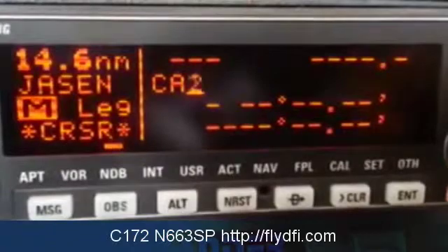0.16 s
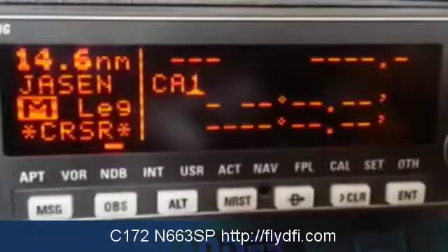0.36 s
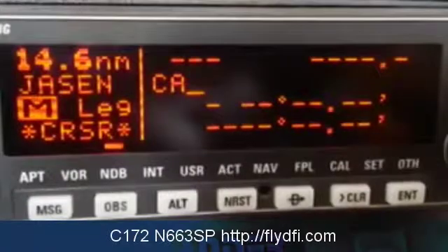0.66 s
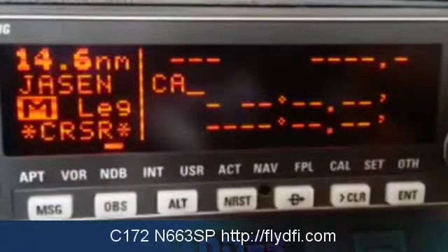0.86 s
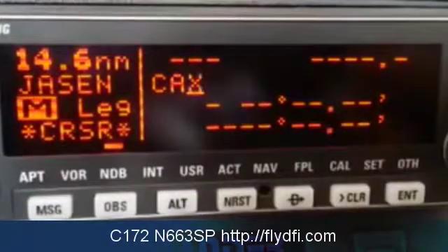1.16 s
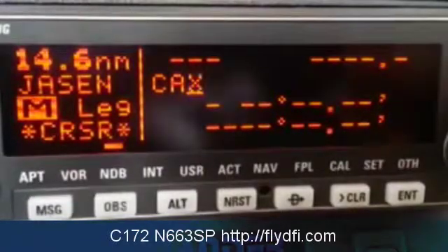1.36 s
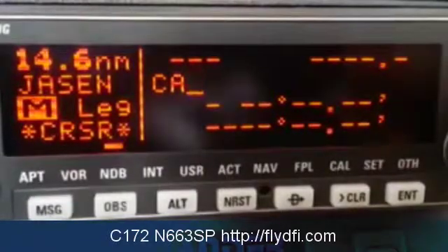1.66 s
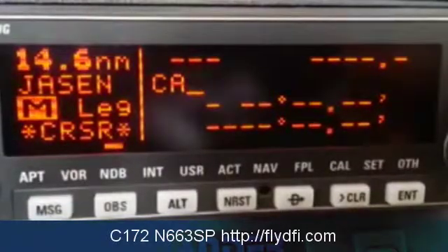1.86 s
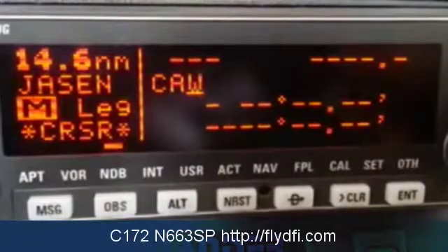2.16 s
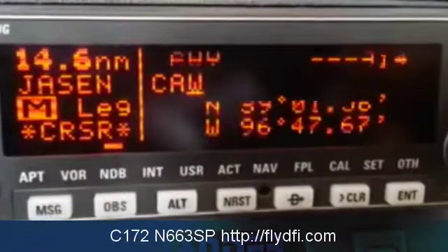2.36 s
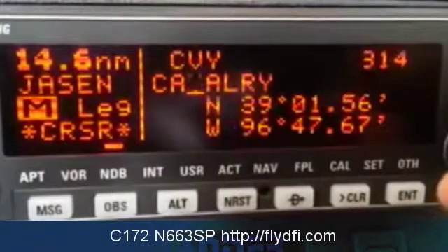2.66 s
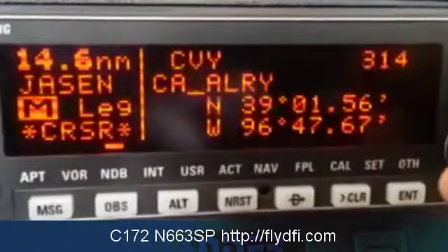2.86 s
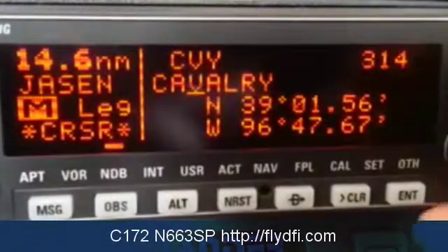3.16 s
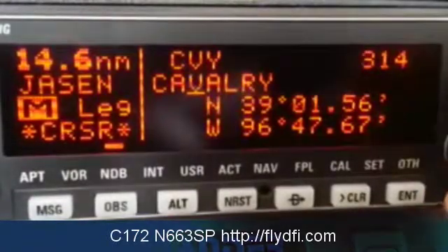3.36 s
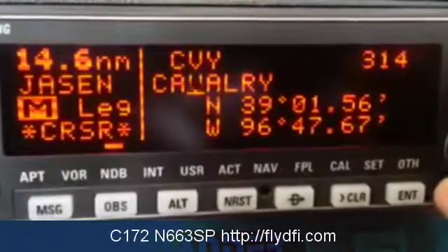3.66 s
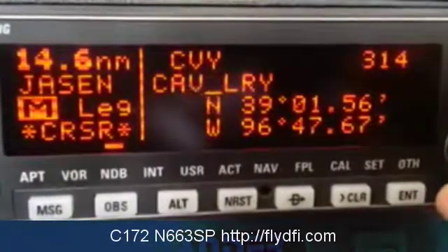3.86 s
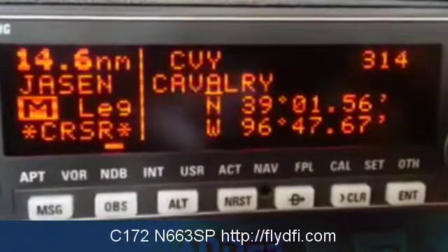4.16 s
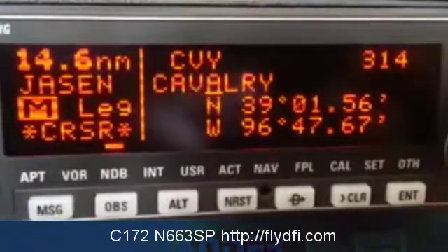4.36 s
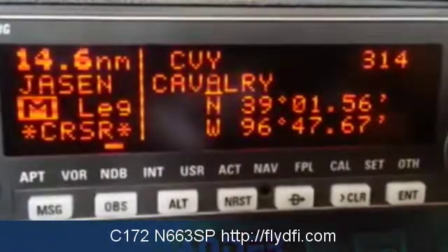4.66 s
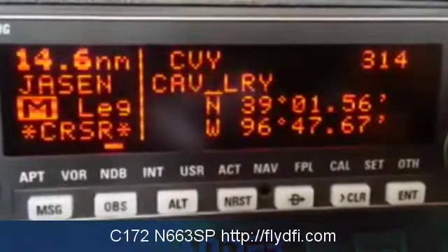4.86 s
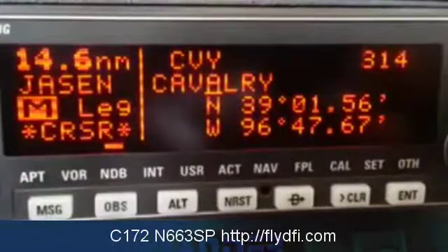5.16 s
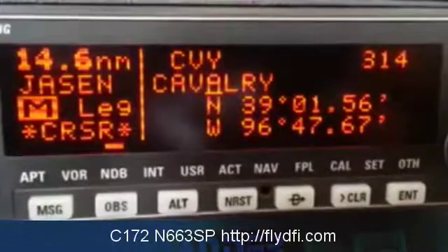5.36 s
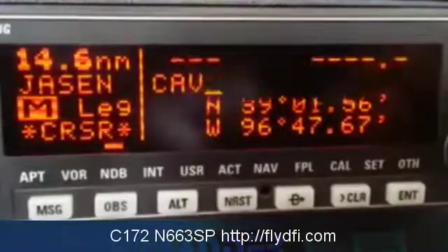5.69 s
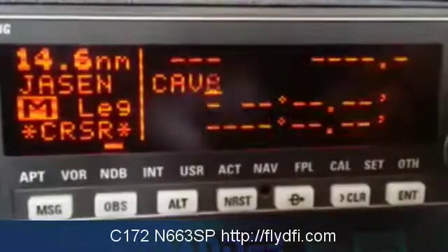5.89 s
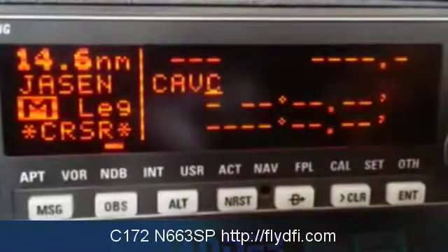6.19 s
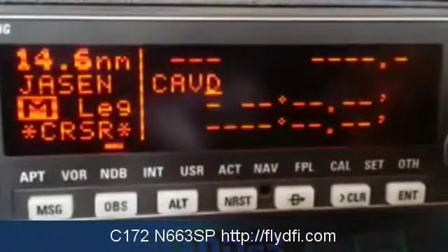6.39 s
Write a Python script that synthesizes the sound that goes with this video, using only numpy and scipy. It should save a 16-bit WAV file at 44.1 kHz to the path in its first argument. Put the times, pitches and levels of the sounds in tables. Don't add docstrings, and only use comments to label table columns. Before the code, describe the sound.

A stiff notched knob snaps sharply in irregular steps inside a small hard cabin, pauses amid faint finger touches, then clicks again over quiet hiss.

```python
import sys
import numpy as np
from scipy import signal
from scipy.io import wavfile
from scipy.ndimage import uniform_filter1d

SR = 44100
rng = np.random.default_rng(int(sys.argv[2]) if len(sys.argv) > 2 else 0)


def field_ratio(decibels):
    return 10 ** (np.asarray(decibels, dtype=float) / 20)


def pcm_store(signal):
    levels = np.round(np.clip(np.atleast_2d(signal), -1, 1) * 32767)
    wavfile.write(sys.argv[1], SR, levels.astype(np.int16).T)


N = 287884

# time in seconds, peak in dB [dB],
# cabin under the peak in dB, left-right balance as the hand shades it in dB, body near 1.5 kHz in dB.
DETENTS = [(0.2078, -1, -15, 0, 0), (0.331, -8.5, -14.5, -2.5, 3), (0.574, -12, -15, -6.5, -7),
           (0.9158, -10.5, -12.5, -4.5, -1), (1.0553, -5.5, -13, -3, -3), (1.4164, -4, -16.5, 1.5, 0.1),
           (2.249, -22.5, -0.5, -0.5, 2), (3.7403, -33, -13.5, -7.5, -3.5), (5.005, -39, -11, -9.5, -7.3),
           (5.6671, -3.5, -15, 0.76, -1.5), (5.9166, -16, -9, -4, 4), (6.2817, -12.5, -11.5, -2, 3.5)]
COLOUR_HZ = [70, 450, 1500, 3000, 5000, 8500]
# frequency in Hz, width in Hz, level in dB.
KNOB_MODES = [(870, 450, -20), (1469, 130, -11), (2600, 2000, -1), (2860, 260, 0.5), (3314, 150, -2),
              (4300, 190, -4.5), (4660, 200, -4), (5430, 110, -10.5), (5900, 130, -6.5), (6570, 390, -0.5),
              (7530, 210, -6), (8380, 540, -2)]
# frequency in Hz, level in dB, T60 in seconds.
PANEL_MODES = [(747, -3, 0.21), (1027, -15.5, 0.16), (1170, -18.5, 1.4), (1519, -6, 0.17),
               (1773, -6.5, 0.16), (2005, -8.5, 0.14), (2515, -11.5, 0.31), (2700, 4, 0.15),
               (3180, -5, 1.6), (3133, 3, 0.085), (2980, -5.5, 0.12), (3830, -24.5, 5.0),
               (4167, -28.5, 0.59), (4640, -16.5, 5.0)]
# frequency in Hz, density in dB per Hz.
SNAP_SPECTRUM = [(24, -47.5), (40, -27), (776, -25.5), (1150, -15.5), (1390, -3), (2610, -9), (3460, -0.5),
                 (3980, -10), (6050, -2.5), (8010, 6.5), (11300, -25), (13800, -59), (22000, -120)]
# frequency in Hz, density in dB per Hz.
CABIN_SPECTRUM = [(24, -40), (40, -14), (305, -11.5), (510, -9), (723, -5.5), (1030, -7), (1150, -2.5),
                  (1460, 0), (3150, -1.5), (3460, -5), (4790, -1.5), (8010, -13.5), (11300, -20),
                  (13800, -54), (22000, -120)]
# frequency in Hz, T60 in seconds.
CABIN_T60 = [(60, 0.56), (300, 0.16), (1000, 0.17), (3000, 0.18), (6000, 0.21), (11000, 0.27)]
# frequency in Hz, likeness (0 to 1).
CABIN_ALIKE = [(60, .45), (500, .6), (1100, 0.3), (11000, 0.063)]
# time in seconds, peak in dB, pitch in Hz.
TAPS = [
    (1.669, -60, 213.9),
    (2.407, -49, 350),
    (2.4075, -55, 656),
    (2.417, -53.5, 277),
    (2.947, -51.5, 374),
    (4.027, -53.5, 520),
    (4.049, -54, 232),
    (4.499, -66, 205),
    (5.199, -58, 246),
]
# time in seconds, peak in dB, pitch in Hz.
TICKS = [
    (2.8664, -56, 6620),
    (2.9477, -43.5, 4510),
    (2.9684, -51.5, 4430),
    (3.4491, -52, 7000),
    (3.7405, -16.5, 10480),
    (3.741, -29, 5510),
    (5.1527, -57, 6360),
    (5.5394, -61.5, 7670),
    (6.1709, -37.5, 3550),
    (6.1844, -48, 3970),
]
# time of the top in seconds,
# level in dB, rise in seconds, fade in seconds.
BRUSHES = [(0.9154, -30.5, 0.0078, .001), (2.948, -59, 0.046, 0.061), (3.448, -74.5, 0.038, .08),
           (3.734, -51.5, 0.048, 0.022), (3.747, -45.5, 0.01, 0.0067), (3.762, -73, .008, 0.059),
           (5.004, -59.5, 0.0043, 0.00069), (5.18, -76.5, 0.13, 0.21), (5.538, -75.5, 0.026, .12),
           (5.9184, -39, 0.023, .001), (6.172, -54.5, .04, 0.049)]
# frequency in Hz, density in dB per Hz.
BRUSH_SPECTRUM = [(470, -40), (800, -5), (1980, -7), (2360, -8), (4140, -3), (5600, -5.5), (9010, -1.5),
                  (11300, -8), (13800, -45), (22000, -120)]
# frequency in Hz, density in dB per Hz.
HISS_SPECTRUM = [(15, -42), (25, -14), (48, -4.5), (67, 1.15), (86, -15.5), (120, 2), (151, -11),
                 (215, -7.5), (405, -10), (448, -10.5), (521, -13.5), (724, -17.5), (1710, -20.5),
                 (8660, -20), (11200, -26.5), (13800, -60), (22000, -120)]
# frequency in Hz, likeness (0 to 1).
HISS_ALIKE = [(40, .65), (120, 0.073), (300, 0.2), (600, 0.1183), (1100, 0.), (11000, 0)]
# frequency in Hz, left-right in dB.
HISS_BALANCE = [(60, -2.5), (170, 7), (470, 7), (1300, 6), (3640, 1.5), (10200, -1)]
# frequency in Hz, level in dB below which lines drop.
AUDIBLE = [(7000, -90), (8600, -76), (9600, -69), (10100, -63), (10500, -71), (10900, -70), (11400, -50)]

EDGES_HZ = 25 * 2 ** np.arange(0, 9.1, 1 / 3)
CENTRES_HZ = np.sqrt(EDGES_HZ[1:] * EDGES_HZ[:-1])
SIDES = np.array([[1], [-1]])
HISS_DB = -70
LEAD_SAMPLES = 1200
STROKE_RANGE_DB = 25
LONG_START, SHORT_START = 365 - 1024, 813 - 1024
SHORT_TOP_HZ = 10800


def colour_db(hz):
    right_db, body_db = -np.array(DETENTS)[:, 3], np.array(DETENTS)[:, 4]
    thud_db = -1.1 + 1.3 * right_db
    middle_db = -1.5 - 0.21 * right_db
    edge_db = -2.5 + 1.2 * right_db
    rows = np.column_stack([thud_db, thud_db, body_db, middle_db, 0 * right_db, edge_db])
    return np.array([np.interp(np.log(hz), np.log(COLOUR_HZ), row) for row in rows])


def knob(crack_t60_s=0.0094, lag_s=0.00055, right_bright_db=6.0, chatter_db=-8.0, knob_db=-10.5, panel_db=-30.0):
    s, peak_db = np.transpose(DETENTS)[:2]
    t = np.arange(SR // 7) / SR
    impacts = field_ratio(chatter_db) * dying(t, crack_t60_s) * rng.standard_normal((len(s), len(t)))
    impacts[:, 0] = 1
    late = np.roll(impacts, round(lag_s * SR), axis=1)
    drive = np.stack([late, impacts], axis=1)
    luck = rng.standard_normal((len(s), 2, len(KNOB_MODES) + len(PANEL_MODES)))
    pan_db = np.array(DETENTS)[:, 3:4] / 2 * SIDES.T
    out = 0
    for k, (hz, width_hz, mode_db) in enumerate(KNOB_MODES):
        level_db = (peak_db + colour_db(hz))[:, None] + mode_db + knob_db + 1.5 * luck[:, :, k]
        level_db = level_db + pan_db - right_bright_db * np.log2(hz / 3000) * SIDES.T
        ring = ringing(drive, hz, np.exp(-np.pi * width_hz / SR))
        out = out + (-1) ** k * field_ratio(level_db)[:, :, None] * ring
    for k, (hz, mode_db, t60_s) in enumerate(PANEL_MODES):
        level_db = (peak_db + colour_db(hz))[:, None] + mode_db + panel_db + 1.4 * luck[:, :1, -k - 1]
        ring = ringing(drive, hz, field_ratio(-60 / (np.clip(t60_s, .02, .1) * SR)))
        out = out + field_ratio(level_db)[:, :, None] * ring
    out = signal.sosfilt(signal.butter(2, 600, "high", fs=SR, output="sos"), out)
    return place(out, s)


def panel_and_cabin(panel_t60_s=.045, panel_db=0.0, build_s=.001, lead_t60_s=0.011, early_pan=.4):
    s, peak_db = np.transpose(DETENTS)[:2]
    cabin_db, pan_db = np.transpose(DETENTS)[2:4, :, None, None]
    lead_db = -29 - 0.37 * pan_db
    t = np.arange(-LEAD_SAMPLES, SR // 4) / SR
    after = np.clip(t, 0, 1)
    lead = field_ratio(lead_db + 60 * np.minimum(t, 0) / lead_t60_s) * (t < 0)
    build = 1 - np.exp(-after / build_s)
    out = 0
    for hz, pair in noise_bands(len(s), 1, len(t)):
        early_t60_s = panel_t60_s * (1 + 150 / hz)
        early = field_ratio(cabin_db + panel_db - 60 * after / early_t60_s) * (t >= 0) + lead
        early_db = at_hz(SNAP_SPECTRUM, hz) + early_pan * pan_db / 2 * SIDES
        early = field_ratio(early_db) / density_rms(SNAP_SPECTRUM) * early
        late_db = cabin_db + at_hz(CABIN_SPECTRUM, hz) - 60 * after / at_hz(CABIN_T60, hz)
        late = field_ratio(late_db) / density_rms(CABIN_SPECTRUM) * build
        strength = field_ratio(peak_db + colour_db(hz) + 1.5 * rng.standard_normal(len(s)))[:, None, None]
        out = out + strength * (early + late) * stereo(pair, at_hz(CABIN_ALIKE, hz))
    return place(out, s - LEAD_SAMPLES / SR)


def taps(rows, t60_s, rough, pan_db):
    t = np.arange(SR // 8) / SR
    slips = rough * dying(t, t60_s) * rng.standard_normal((len(rows), len(t)))
    slips[:, 0] = 1
    r = field_ratio(-60 / (t60_s * SR))
    rings = [field_ratio(db) * ringing(slip, hz, r) for slip, (s, db, hz) in zip(slips, rows)]
    return place(np.array(rings)[:, None] * field_ratio(pan_db * SIDES), np.array(rows)[:, 0])


def hiss_and_brushes(rumble_flicker_db=-1.0, grain_db=4.0, brush_pan_db=-1.5):
    t, stroke = np.arange(N) / SR, np.zeros(N)
    for s, level_db, rise_s, fade_s in BRUSHES:
        away = np.maximum((s - t) / max(rise_s, 1e-3), (t - s) / max(fade_s, 1e-3))
        stroke += field_ratio(level_db - STROKE_RANGE_DB * away)
    grain = uniform_filter1d(rng.standard_normal(N), size=100) * 10
    stroke = stroke * field_ratio(grain_db * grain + brush_pan_db * SIDES)
    slow = np.interp(t, np.arange(0, 7, .08), rng.standard_normal(88))
    out = 0
    for hz, pair in noise_bands(N):
        floor_db = HISS_DB + at_hz(HISS_SPECTRUM, hz) + at_hz(HISS_BALANCE, hz) / 2 * SIDES
        floor_db = floor_db + rumble_flicker_db * slow * (hz < 700)
        floor = field_ratio(floor_db + 2.5) / density_rms(HISS_SPECTRUM)
        brush = stroke * field_ratio(at_hz(BRUSH_SPECTRUM, hz) + 2.0) / density_rms(BRUSH_SPECTRUM)
        out = out + (floor + brush) * stereo(pair, at_hz(HISS_ALIKE, hz))
    return out


def at_hz(points, hz):
    return np.interp(np.log(hz), np.log(np.array(points)[:, 0]), np.array(points)[:, 1])


def dying(seconds, t60_s):
    return field_ratio(-60 * seconds / t60_s)


def ringing(drive, hz, r):
    w = 2 * np.pi * hz / SR
    return signal.lfilter([0, np.sin(w)], [1, -2 * r * np.cos(w), r * r], drive)


def noise_bands(*shape):
    white = rng.standard_normal((2, 2, *shape))
    for k, hz in enumerate(CENTRES_HZ):
        band = signal.butter(2, EDGES_HZ[k:k + 2], "band", fs=SR, output="sos")
        yield hz, signal.sosfilt(band, white[k % 2])


def stereo(pair, alike):
    alike = np.clip(alike, -1, 1)
    return np.sqrt(1 + alike) * pair[0] + np.sqrt(1 - alike) * pair[1] * SIDES


def density_rms(spectrum):
    return np.sqrt(np.sum(field_ratio(2 * at_hz(spectrum, CENTRES_HZ)) * np.diff(EDGES_HZ)) * 4 / SR)


def place(pieces, times_s):
    out = np.zeros((2, N + pieces.shape[2]))
    for piece, s in zip(pieces, times_s):
        out[:, round(s * SR):][:, :piece.shape[1]] += piece
    return out[:, :N]


def scene():
    fingertips = taps(TAPS, t60_s=0.077, rough=0.027, pan_db=1.0)
    nails = field_ratio(-13) * taps(TICKS, t60_s=0.015, rough=0.47, pan_db=-2.5)
    return knob() + panel_and_cabin() + fingertips + nails + hiss_and_brushes()


def lapped(x, start, size):
    n = np.arange(2 * size)[:, None] + .5
    window = np.sin(np.pi * n / (2 * size))
    basis = window * np.cos(np.pi / size * (n + size / 2) * n[:size].T) * np.sqrt(2 / size)
    count = (N - start) // size + 2
    padded = np.pad(x, ((0, 0), (-start, (count + 1) * size + start - N)))
    blocks = padded.reshape(2, count + 1, size)
    lines = blocks[:, :-1] @ basis[:size] + blocks[:, 1:] @ basis[size:]

    def back(lines):
        out = np.zeros_like(blocks)
        out[:, :-1] += lines @ basis[:size].T
        out[:, 1:] += lines @ basis[size:].T
        return out.reshape(2, -1)[:, -start:N - start]
    return lines, back


def long_blocks(x, hole_share=0.08, sway_db=6.5, coarse=.5):
    lines, back = lapped(x, LONG_START, size=1024)
    count = lines.shape[1]
    hz = (np.arange(1024) + .5) * SR / 2048
    sway = np.repeat(rng.standard_normal((count, 64)), 16, axis=1)
    keep = np.abs(lines) > field_ratio(at_hz(AUDIBLE, hz) + sway_db * sway)
    busy = np.abs(lines[0, ::3]).mean(axis=1, keepdims=True) > field_ratio(-60)
    busy = np.pad(busy, ((0, count // 3 + 1 - len(busy)), (0, 0)))
    holes = rng.random((count // 3 + 1, 128)) < np.clip(hole_share, 0, 1) * (1 + 2.8 * busy)
    holes = np.repeat(np.repeat(holes, 3, axis=0), 8, axis=1)[:count] & (hz > 1000)
    coarse = np.full((count, 1), coarse)
    for s in np.array(DETENTS)[:, 0]:
        frame = int((s * SR - LONG_START) // 1024)
        holes[frame - 1:frame + 1] = False
        coarse[frame - 1:frame + 1] = .002
    step = uniform_filter1d(np.abs(lines), size=24, axis=2) * coarse + 1e-9
    return back(np.round(lines / step) * step * keep * ~holes)


def short_blocks(x, hush_db=17, run_up_db=-60, snap_step_db=-32):
    lines, back = lapped(x, SHORT_START, size=128)
    hz = (np.arange(128) + .5) * SR / 256
    for s, peak_db in np.array(DETENTS)[:, :2]:
        snap = int((s * SR - SHORT_START) // 128)
        first, left = min((snap - 1) // 8 * 8, snap - 5), 7 - snap % 8
        growth_db = np.clip(1.2 * (peak_db + 4 * left - 12), 0, 11)
        quiet = np.median(np.abs(lines[:, first:snap - 2, hz < SHORT_TOP_HZ])) * field_ratio(hush_db)
        quiet = min(quiet, field_ratio(max(peak_db + snap_step_db + 8, run_up_db)))
        before = np.full(snap - 1 - first, quiet)
        after = field_ratio(peak_db + snap_step_db + growth_db * (np.arange(left + 1) + .4))
        step = np.r_[before, field_ratio(run_up_db), after][:, None]
        group = lines[:, first:snap + left + 1]
        rounded = np.floor(np.abs(group) / step + .4) * step
        group[:] = np.sign(group) * rounded * (hz < SHORT_TOP_HZ)
    return back(lines)


def low_pass(x):
    return signal.sosfilt(signal.butter(12, 11400, fs=SR, output="sos"), x)


def record(dry):
    cut = signal.sosfilt(signal.cheby2(10, 60, 11800, fs=SR, output="sos"), dry)
    cut = signal.sosfilt(signal.butter(2, 45, "high", fs=SR, output="sos"), cut)
    thinned = short_blocks(long_blocks(cut))
    mix = np.clip(thinned, -1, 1)
    return low_pass(mix)


dry = scene()
out = record(dry)
pcm_store(out)
```